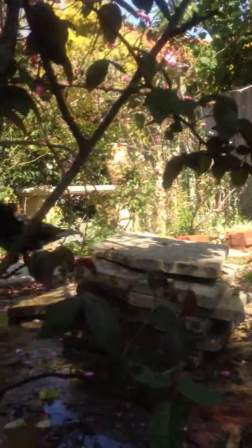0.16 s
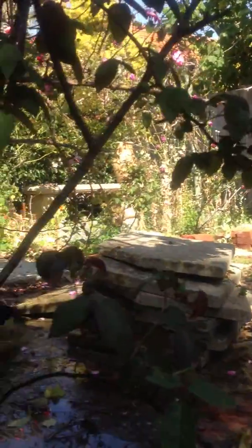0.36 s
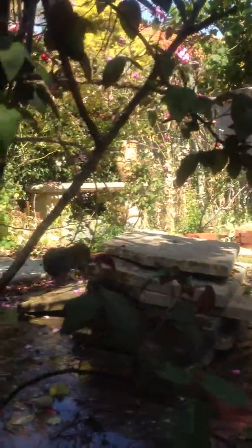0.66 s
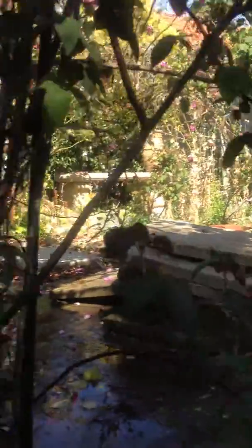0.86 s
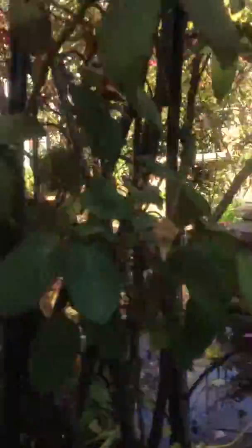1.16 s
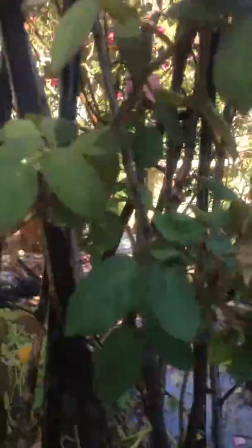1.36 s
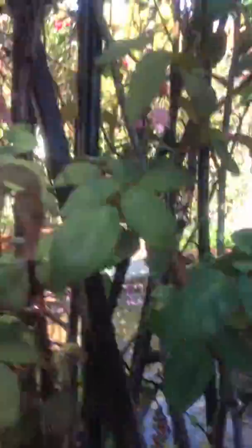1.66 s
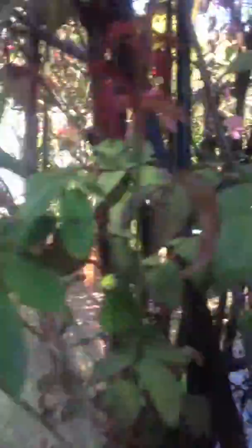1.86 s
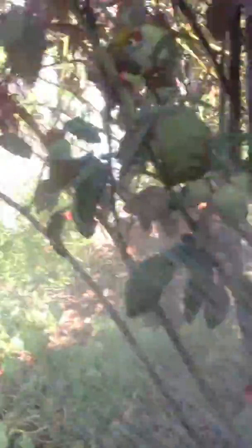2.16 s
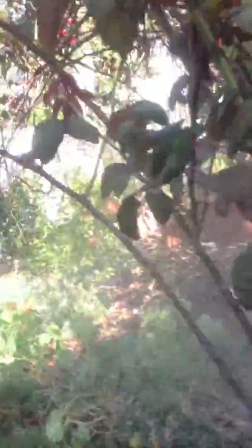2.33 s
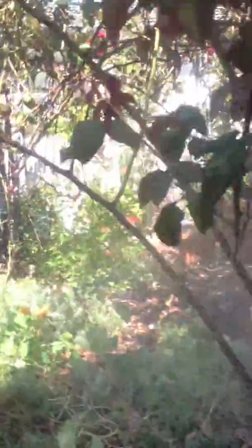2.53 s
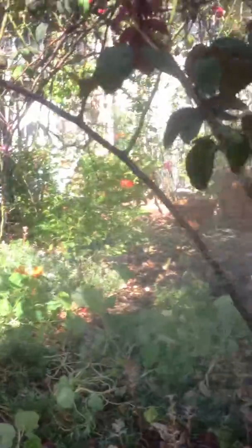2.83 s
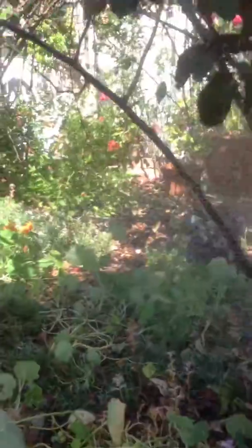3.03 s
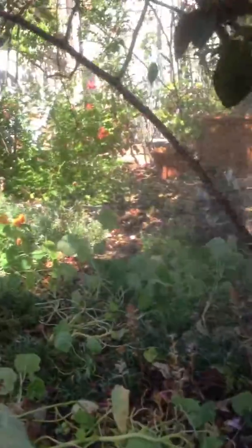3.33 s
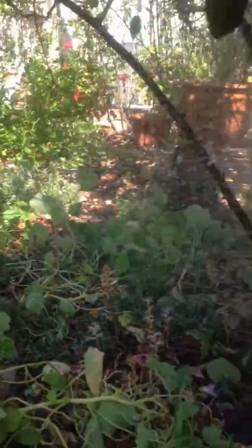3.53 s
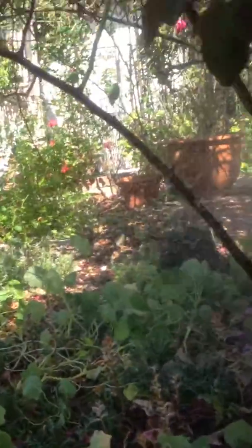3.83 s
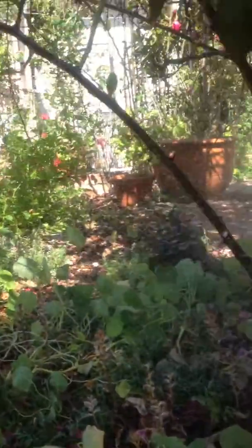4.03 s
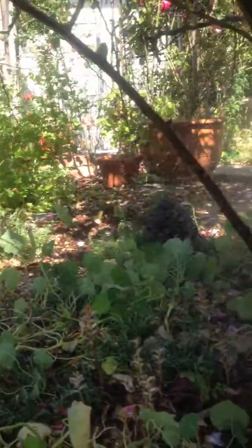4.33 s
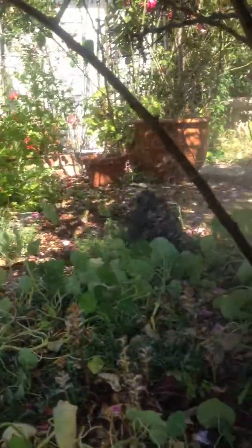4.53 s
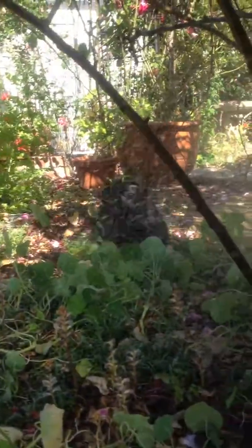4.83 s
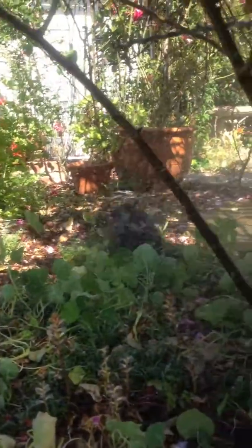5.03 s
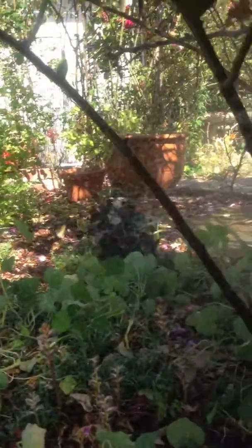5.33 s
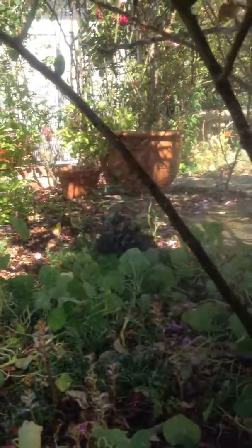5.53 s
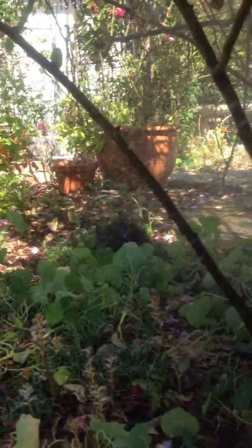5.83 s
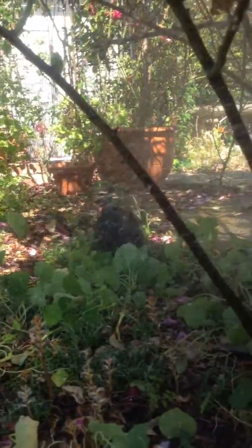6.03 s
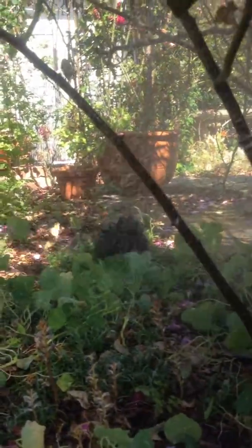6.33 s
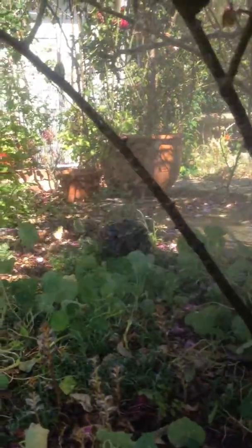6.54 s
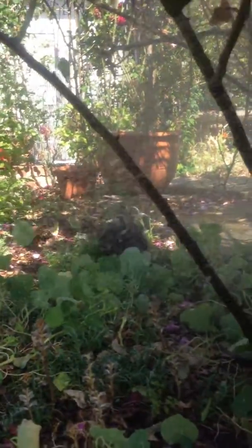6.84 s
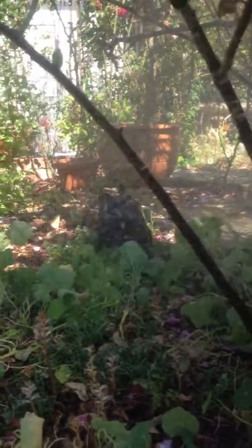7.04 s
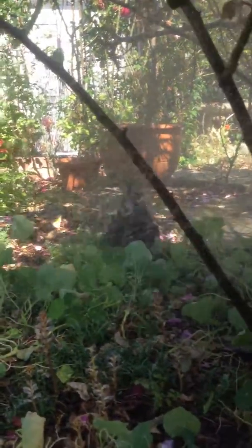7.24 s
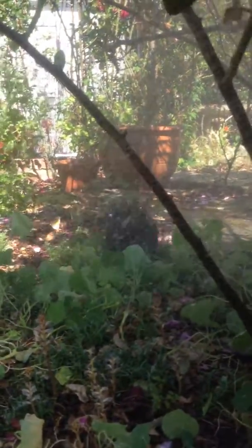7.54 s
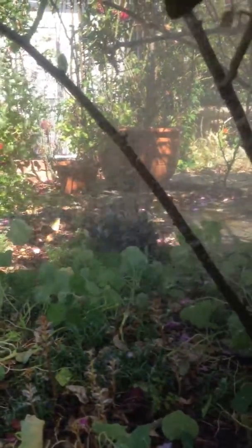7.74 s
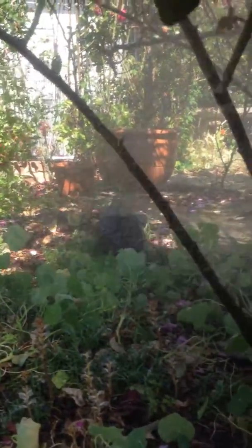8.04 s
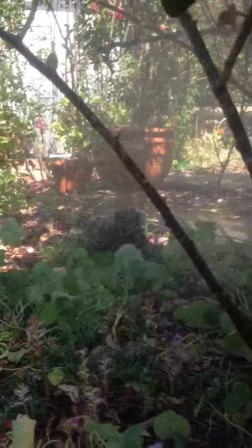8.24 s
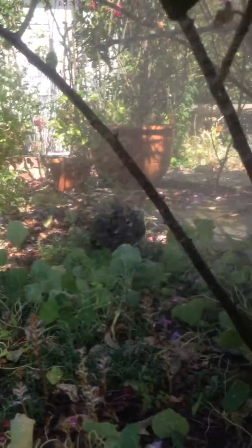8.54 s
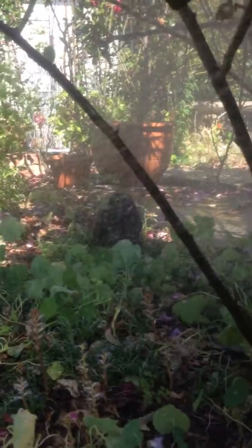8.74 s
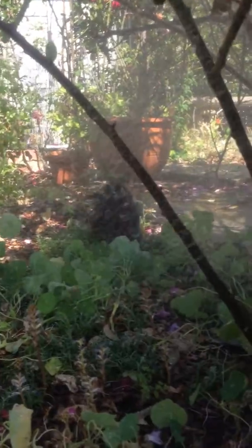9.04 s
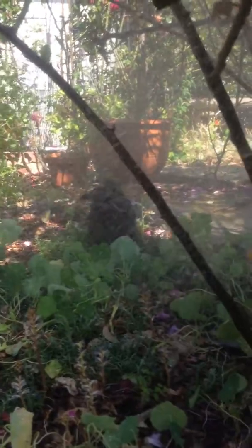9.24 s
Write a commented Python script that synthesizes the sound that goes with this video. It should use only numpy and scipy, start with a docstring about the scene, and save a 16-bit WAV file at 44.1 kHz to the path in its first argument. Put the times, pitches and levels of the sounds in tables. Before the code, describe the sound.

A garden hose sprays water over plants throughout, a steady hiss blended with a dense, fine patter of droplets on leaves. At first it is a little quieter and duller, heard from behind a shrub, and a soft low puff of air bumps the microphone at about 0.2 seconds. Between 1.1 and 2.2 seconds, leaves brush past in a few short rustles, the sharpest near 1.4 seconds. The spray grows louder by 2.5 seconds. Around 3 seconds the thin nozzle hiss recedes, and the patter keeps brightening until about 5.5 seconds. Faint, sharp ticks of close drops are scattered through it, clearer from 4 seconds on. A light wind rumble lies underneath, with soft thumps on the microphone from about 5.3 seconds, the strongest near 8.1 seconds. The spray is still running at the end, around 9.4 seconds.

```python
"""A garden hose misting plants

The spray is heard first from behind a shrub, then from the open bed. The turbulent jet hisses at
the nozzle, countless droplets patter on the leaves, and a few fat drops tick close by.
Foliage brushes past on the way, and eddies of air thump softly on the microphone."""
import sys
import numpy as np
from scipy import signal
from scipy.fft import rfft, irfft, next_fast_len
from scipy.io import wavfile

SR = 44100
rng = np.random.default_rng(int(sys.argv[2]) if len(sys.argv) > 2 else 0)


def bounce(signal):
    """Save signal as a 16-bit WAV file at the path given by the first command-line argument."""
    frames = np.transpose(np.atleast_2d(signal))
    limited = np.clip(frames, -1, 1)
    pcm = np.round(limited * 32767).astype(np.int16)
    wavfile.write(sys.argv[1], SR, pcm)


N = 414099

# The spray, louder on leaving the shrub and brighter in the open.
# Each row: time in seconds, relative level in dB, relative brightness in dB.
SPRAY_COURSE = [(0, -43, -3), (0.85, -43.5, -3.5), (1.7, -40.5, -2.5), (2.45, -37.5, -1.5),
                (4.2, -38.4, 2.4), (5.6, -38.5, 4.5), (9.39, -37, 2.5)]
# Air moving over the microphone. Each row: time in seconds, relative strength of flow in dB.
AIRFLOW = [(0, -61), (0.95, -64), (1.6, -58.5), (3.7, -62), (5.5, -56), (7.2, -58), (9.39, -56)]
# The spectrum of its turbulence. Each row: frequency in Hz, relative spectral density in dB.
AIR_SPECTRUM = [(25, -46), (50, -25), (80, -14.5), (115, -4.5), (152, 0.5), (195, -2), (245, -9.5),
                (350, -16.5), (800, -30)]


def spray(mist_db, leaf_db, splash_db, surge_db, flicker_db, shade_hz):
    """Superposition of impacts: mist merges to a hiss, larger drops crackle; foliage shades the treble."""
    # Water striking plants. Each row: frequency in Hz, filter gain in dB.
    patter_spectrum = [(150, -13.5), (260, -6), (550, -4.5), (1200, -6), (2200, -2.5), (3100, -0.6),
                       (4000, 0.3), (6000, 0.1), (7100, 0), (8400, 0.8), (9900, -4), (11700, -0.6),
                       (15500, -3.5)]
    level_db, treble_db = in_time(SPRAY_COURSE)
    mist = from_db(mist_db) * rng.standard_normal(N)
    rings = from_db(leaf_db) * leaves(per_s=6000, spread_db=2.5, cycles=20)
    splashes = from_db(splash_db) * cut(droplets(per_s=4500, spread_db=4.5), 10000, "high", order=3)
    patter = coloured(mist + rings + splashes, patter_spectrum)
    body = low_band(patter, shade_hz)
    treble = (patter - body) * from_db(treble_db - 2 + flicker_db * drift(25))
    # the jet breaks up unevenly, so the drops arrive in surges
    return (body + treble) * from_db(level_db + 8 + surge_db * drift(17))


def leaves(per_s, spread_db, cycles):
    """Damped resonance: each drop rings a wet leaf at one of 20 pitches, losing 60 dB over `cycles`."""
    hits = droplets(per_s, spread_db)
    leaf_hit = rng.integers(0, 20, N)
    out = 0
    for leaf, hz in enumerate(np.geomspace(900, 10000, 20)):
        radius = from_db(-60 * hz / (cycles * SR))
        resonator = [1, -2 * radius * np.cos(2 * np.pi * hz / SR), radius ** 2]
        ring = signal.lfilter([1, 0, -1], resonator, hits * (leaf_hit == leaf) + 1e-18)
        out += np.sqrt(hz) * rms_one(ring)
    return rms_one(out)


def droplets(per_s, spread_db):
    """A Poisson process of impacts, many small and few large; rms 1."""
    sizes = from_db(spread_db * np.minimum(rng.exponential(1, N), 5))
    return rms_one(sizes * rng.choice([-1, 1], N) * (rng.random(N) < per_s / SR))


def resonances(swell_db, wander, opening):
    """Narrow-band noise swells and shifts as the jet sways; it stands out more in the open."""
    # Resonances in the spray. Each row: centre in Hz, width in Hz, relative level in dB.
    bands = [(2830, 88, -15.5), (3245, 280, -11.5), (4560, 370, -11), (5870, 320, -14.5), (6510, 84, -15.5),
             (7910, 450, -8.5)]
    level_db, treble_db = in_time(SPRAY_COURSE)
    out = 0
    for hz, width_hz, db in bands:
        phase = 2 * np.pi * np.cumsum(hz * (1 + wander * drift(.8))) / SR
        in_phase, quadrature = cut(rng.standard_normal((2, N)), width_hz / 2, "low")
        band = rms_one(in_phase * np.cos(phase) + quadrature * np.sin(phase))
        out += band * from_db(db + swell_db * drift(3.3))
    return out * from_db(level_db + opening * (treble_db - treble_db.max()))


def nozzle(facing_db, away_db, turn_s, turn_length_s, pass_s, half_width_s, pass_db):
    """Jet turbulence hisses, swelling as the microphone passes and fading as it turns to the bed."""
    # The hiss of the jet. Each row: frequency in Hz, relative spectral density in dB.
    jet_spectrum = [(200, -12.5), (1300, -10.5), (3000, -10.5), (3900, -21), (4500, -4), (4900, 2.5),
                    (5300, -1), (5900, -0.5), (6800, -7.5), (8000, -13.5), (9600, -9), (15500, -11.5)]
    t = np.arange(N) / SR
    turned = (1 + np.tanh((t - turn_s) / turn_length_s * 2)) / 2
    passing = 1 / (1 + ((t - pass_s) / half_width_s) ** 2)
    level_db = facing_db + (away_db - facing_db) * turned + pass_db * passing
    return coloured(rng.standard_normal(N), jet_spectrum) * from_db(level_db + .5 * drift(14))


def ticks(gain_db, decay_s, strays_per_s, stray_over_spray_db):
    """A brief impulse has a broad spectrum: each close drop bursts in a bright crack."""
    # The fattest drops. Each row: start in seconds, relative peak level in dB.
    fat_drops = [(3.9923, -17), (4.9194, -17), (5.3144, -14), (6.6404, -14), (7.3344, -13), (8.7594, -14),
                 (8.7694, -11)]
    out, t = np.zeros(N), np.arange(SR // 200) / SR
    patter_db, treble_db = in_time(SPRAY_COURSE)
    strays = at_random(strays_per_s, patter_db + treble_db + stray_over_spray_db)
    for start, db in fat_drops + strays:
        crack = cut(rng.standard_normal(len(t)) * np.exp(-t / decay_s), [8000, 15000], "band")
        add(out, start, from_db(db + gain_db) * crack / np.abs(crack).max())
    return out


def brushes():
    """Stick-slip friction: leaves slide past in short swells of dense, tiny slips."""
    # Rubbing foliage. Each row: frequency in Hz, relative spectral density in dB.
    slip_spectrum = [(250, -6), (700, -15), (1050, -3.5), (1250, -3.5), (1380, 3.5), (1600, -4),
                     (1900, -4.5), (3000, -3), (5000, -4), (7000, -7), (10000, -10), (15500, -22)]
    # Passing leaves. Each row: midpoint in seconds, length in seconds, level in dB, low-pass in Hz.
    strokes = [(1.168, 0.14, -44, 7000), (1.357, 0.056, -31.5, 12000), (1.444, 0.057, -39.5, 7000),
               (1.68, 0.093, -44, 1900), (2.06, 0.14, -43, 1800)]
    slips = coloured(droplets(per_s=9000, spread_db=2), slip_spectrum)
    out, t = np.zeros(N), np.arange(N) / SR
    for middle, length, db, corner_hz in strokes:
        swell = np.exp(-(2 * (t - middle) / length) ** 4 / 2)
        out += from_db(db) * swell * rms_one(cut(slips, corner_hz, "low"))
    return out


def puffs(gain_db, snap_hz, eddies, gap_s, loss_db, wake_db, wake_s):
    """Vortex shedding: each puff is a train of ever weaker pressure pulses inside a short flutter."""
    # Puffs on the microphone. Each row: start in seconds, relative level in dB, pitch in Hz,
    # rise time in seconds.
    strong = [(0.19, -35, 135, .004), (0.219, -24, 135, .0032), (0.321, -37.5, 161, 0.0042),
              (1.727, -36, 151, 0.0033), (5.341, -35, 120, 0.0041), (5.47, -42, 127, 0.0068),
              (5.826, -40, 144, .006), (6.038, -36, 190, .003), (6.34, -30.5, 130, 0.0035),
              (6.577, -30, 165, 0.0079), (6.633, -36, 190, .003), (7.658, -32.5, 120, 0.0054),
              (7.699, -33.5, 161, 0.004), (8.071, -22.5, 143, 0.0044), (8.164, -31.5, 165, 0.0054),
              (8.298, -39.5, 198, 0.0053), (8.394, -37, 131, .0037), (8.612, -39, 152, 0.0044),
              (9.312, -30.5, 150, 0.0047), (9.345, -35.5, 180, .005)]
    out, wake, t = np.zeros(N), np.zeros(N), np.arange(SR // 10) / SR
    flow_db, = in_time(AIRFLOW)
    faint = [(start, db, 120, 0.005) for start, db in at_random(per_s=4, level_db=flow_db + 7)]
    hardest_db = max(row[1] for row in strong)
    for start, db, hz, rise_s in strong + faint:
        bump = (t / rise_s * np.exp(1 - t / rise_s)) ** 2
        # the harder the puff, the higher it starts before sinking to its pitch
        lift_hz = snap_hz * np.sqrt(from_db(db - hardest_db))
        turns = hz * t + lift_hz * rise_s * (1 - np.exp(-t / rise_s))
        for k, (phase, lateness) in enumerate(rng.random((eddies, 2))):
            eddy = from_db(db + gain_db - loss_db * k) * bump * np.sin(2 * np.pi * (turns + phase))
            add(out, start + k * gap_s * (1 + (lateness - .5) / 2), eddy)
        add(wake, start, from_db([db]))
    swell = np.exp(-np.abs(np.arange(-SR // 5, SR // 5) / SR) / wake_s)
    flutter = coloured(rng.standard_normal(N), AIR_SPECTRUM) * signal.fftconvolve(wake, swell, "same")
    return cut(out + from_db(wake_db) * flutter, 60, "high", order=3)


def breeze(gain_db, lumpy_db, deep_hz, deep_db_per_db):
    """Turbulence rumbles at the microphone; stronger flow sheds larger eddies, which sound deeper."""
    flow_db, = in_time(AIRFLOW)
    rumble = coloured(rng.standard_normal(N), AIR_SPECTRUM)
    deep = low_band(rumble, deep_hz)
    rumble = rumble - deep + deep * from_db(deep_db_per_db * (flow_db - flow_db.mean()))
    return rumble * from_db(flow_db + gain_db + lumpy_db * drift(8.2))


def from_db(db):
    """Decibels to amplitude ratio."""
    return 10 ** (np.asarray(db) / 20)


def rms_one(x):
    """Normalisation to unit rms."""
    return x / np.sqrt(np.mean(x ** 2) + 1e-20)


def in_time(rows):
    """Linear interpolation of each column of a time curve at every sample."""
    times, *columns = np.transpose(rows)
    return [np.interp(np.arange(N) / SR, times, column) for column in columns]


def shaped(x, db_at):
    """Zero-phase filtering by a gain in dB given as a function of frequency."""
    size = next_fast_len(N + 4096)
    hz = np.maximum(np.arange(size // 2 + 1) * SR / size, 1)
    return irfft(rfft(x, size) * from_db(db_at(hz)), size)[:N]


def low_band(x, corner_hz):
    """A zero-phase low-pass, so that subtracting it leaves the high band."""
    return shaped(x, lambda hz: -20 * np.log10(1 + (hz / corner_hz) ** 4))


def coloured(x, spectrum):
    """Spectral shaping that falls 12 dB per octave below the first point; rms 1."""
    points, db = np.transpose(spectrum)

    def gain_db(hz):
        roll_off = 40 * np.log10(np.minimum(hz / points[0], 1))
        return np.interp(np.log(hz), np.log(points), db) + roll_off
    return rms_one(shaped(x, gain_db))


def cut(x, hz, kind, order=2):
    """Butterworth low-, high- or band-pass."""
    return signal.sosfilt(signal.butter(order, hz, kind, fs=SR, output="sos"), x)


def drift(hz):
    """Low-passed noise gives a slow random wander; rms 1."""
    step = 40  # samples between points
    pole = np.exp(-2 * np.pi * hz * step / SR)
    slow = signal.lfilter([1], [1, -2 * pole, pole ** 2], rng.standard_normal(N // step + 2002))[2000:]
    return np.interp(np.arange(N) / step, np.arange(len(slow)), rms_one(slow))


def at_random(per_s, level_db):
    """Chance events. Each row: start in seconds, level in dB within 2 dB of the given curve."""
    draws = rng.random((int(per_s * N / SR), 2))
    return [(when * N / SR, level_db[int(when * N)] + 2 * (2 * size - 1)) for when, size in draws]


def add(out, start_s, sound):
    """Superposition of a short sound at a given time."""
    start = int(np.clip(round(start_s * SR), 0, N - 1))
    out[start:start + len(sound)] += sound[:N - start]


def scene():
    """The pressures of water, foliage and air sum at one microphone that feeds both channels."""
    water = spray(mist_db=-2.5, leaf_db=-9.5, splash_db=-5.5,
                  surge_db=0.53, flicker_db=0.38, shade_hz=7000)
    water += resonances(swell_db=2.5, wander=.006, opening=0.62)
    water += nozzle(facing_db=-39, away_db=-46, turn_s=2.9, turn_length_s=1.3,
                    pass_s=1.44, half_width_s=0.099, pass_db=3.5)
    air = breeze(gain_db=2.5, lumpy_db=2.5, deep_hz=110, deep_db_per_db=1.6)
    air += puffs(gain_db=1.5, snap_hz=235, eddies=3, gap_s=0.024, loss_db=14.5,
                 wake_db=-17, wake_s=0.032)
    foliage = brushes()
    close_drops = ticks(gain_db=-1, decay_s=0.00044, strays_per_s=2.8, stray_over_spray_db=13)
    mono = water + close_drops + foliage + air
    return np.array([mono, mono])


def record(dry):
    """Frequency response: the microphone port colours the treble, and the top is cut steeply."""
    # Narrow peaks and dips of the port. Each row: centre in Hz, width in Hz, gain in dB.
    port_bands = [(4680, 570, -0.2), (5160, 200, -2.5), (7620, 330, 0.9)]
    cutoff_hz = 15300

    def response_db(hz):
        port_db = sum(db * np.exp(-2 * ((hz - centre) / width) ** 2) for centre, width, db in port_bands)
        return port_db - np.clip((hz - cutoff_hz) / 3, 0, 90)
    return np.array([shaped(channel, response_db) for channel in dry])


dry = scene()
out = record(dry)
bounce(out)
```